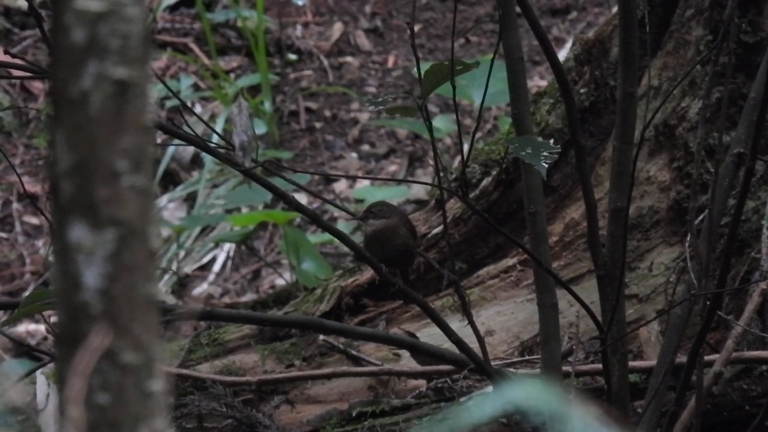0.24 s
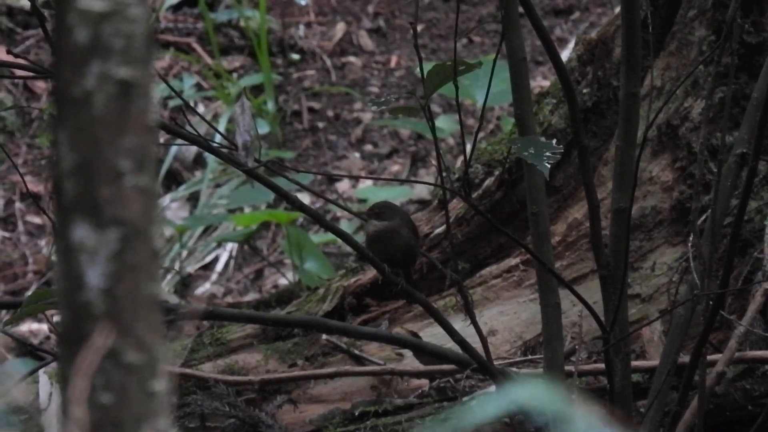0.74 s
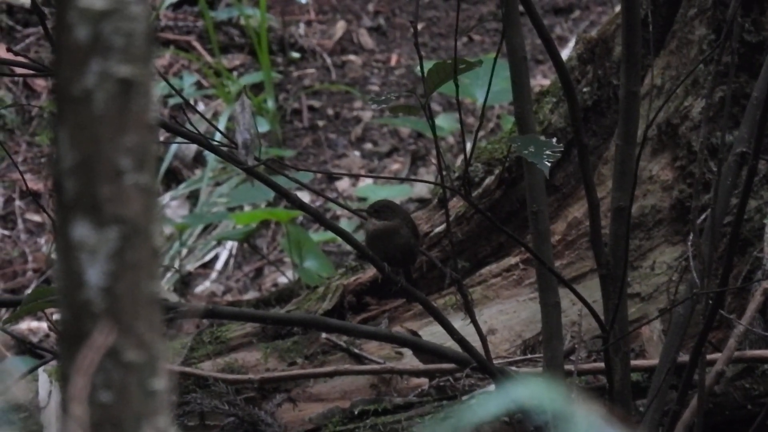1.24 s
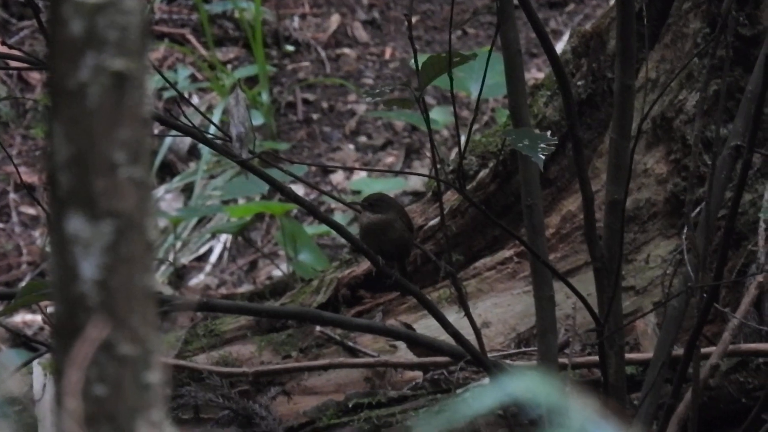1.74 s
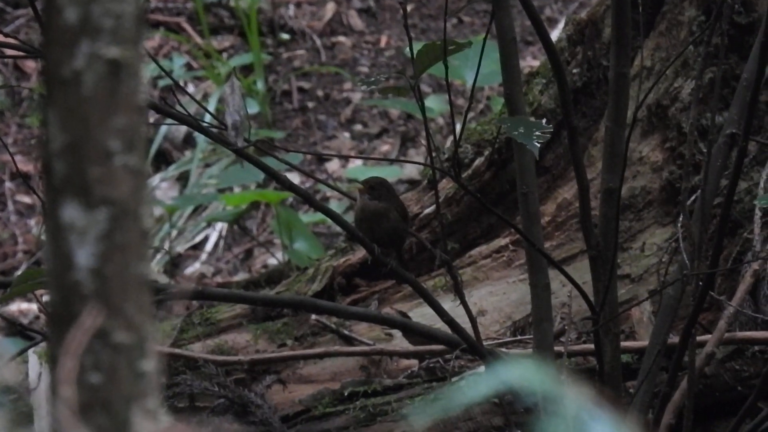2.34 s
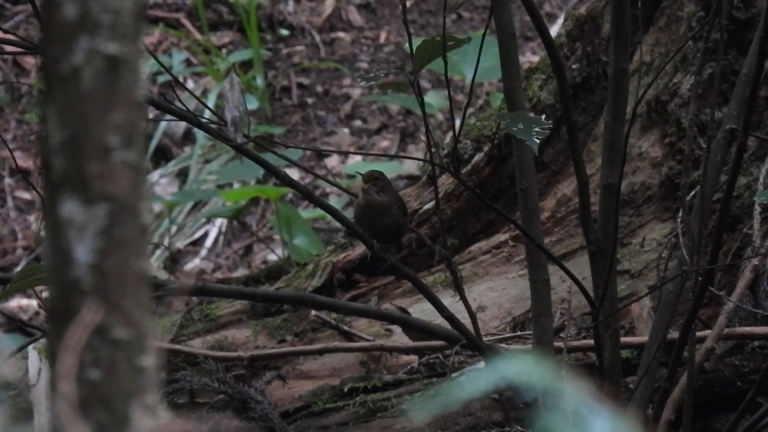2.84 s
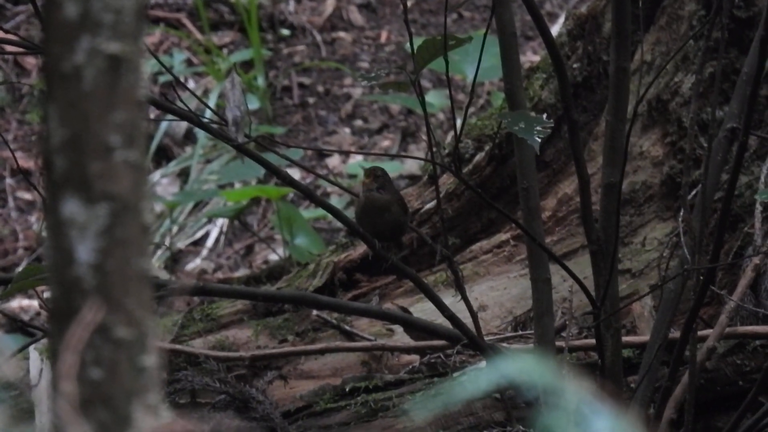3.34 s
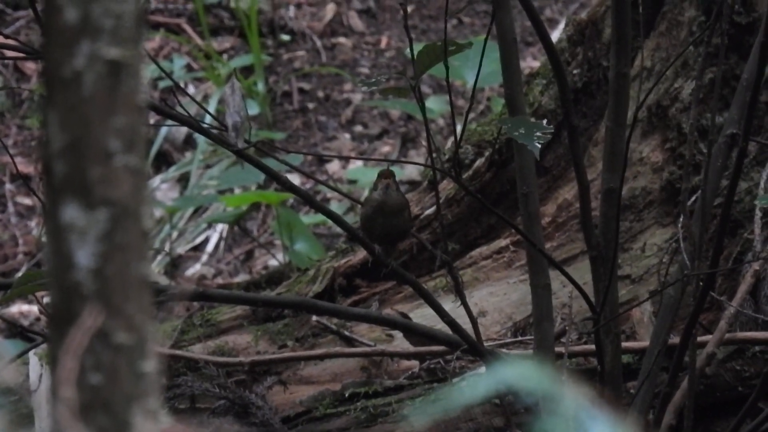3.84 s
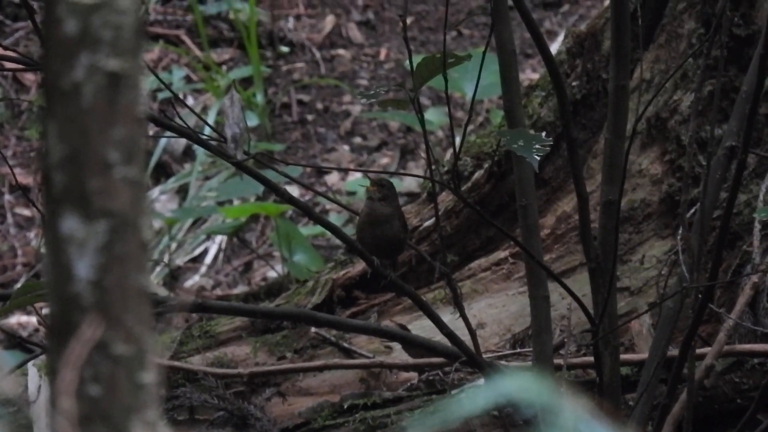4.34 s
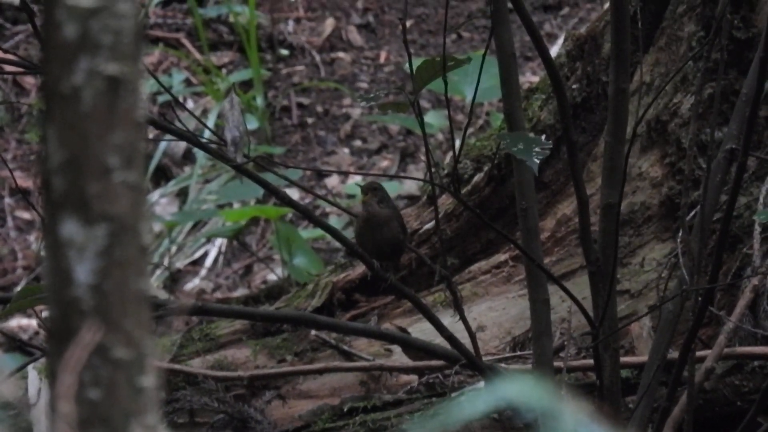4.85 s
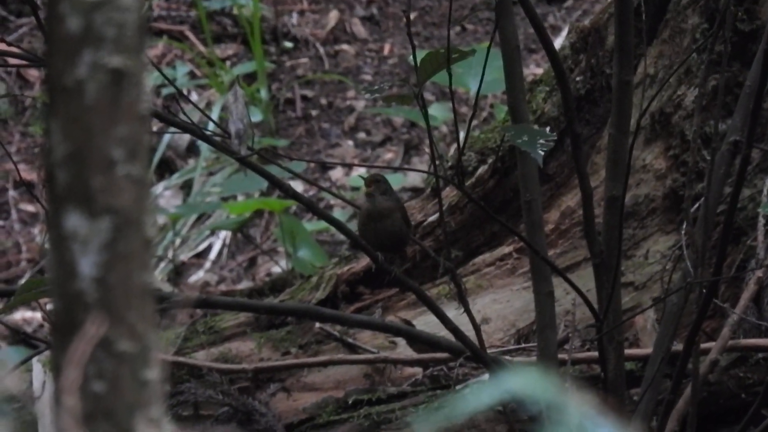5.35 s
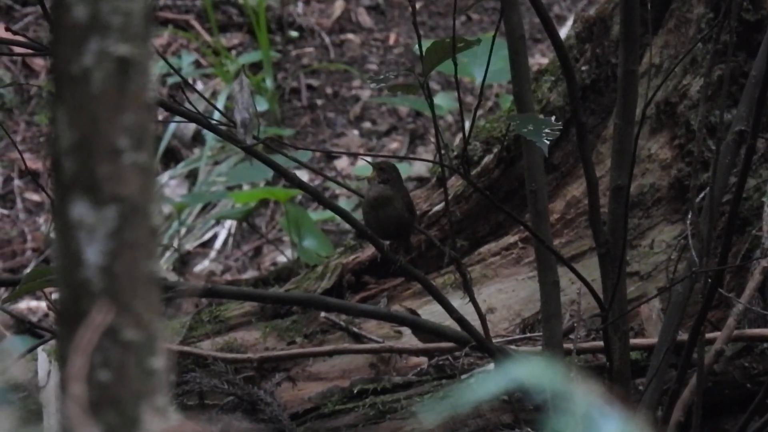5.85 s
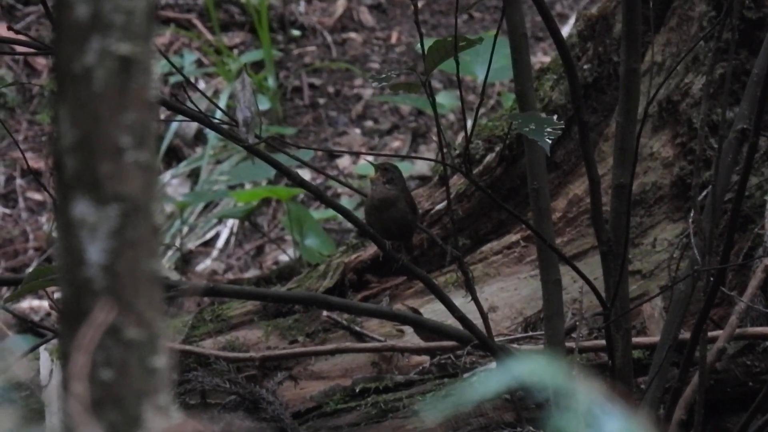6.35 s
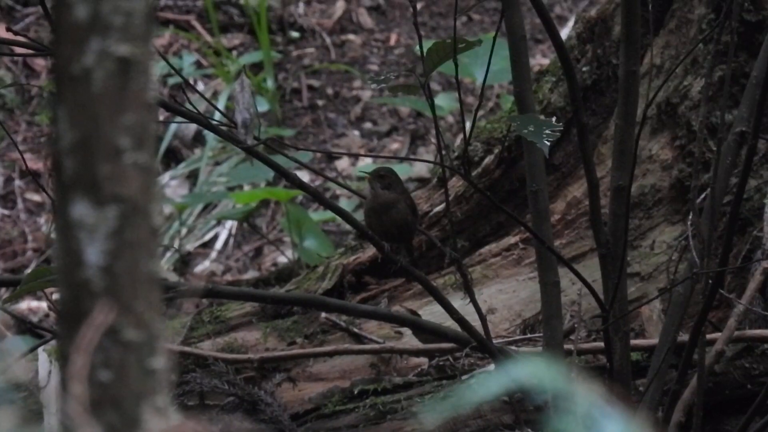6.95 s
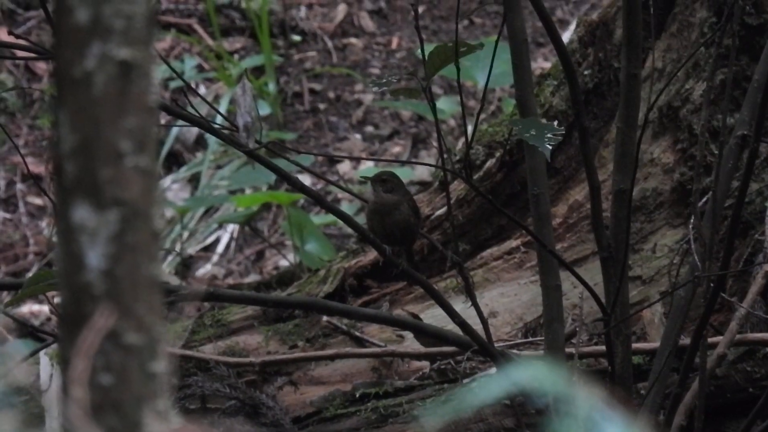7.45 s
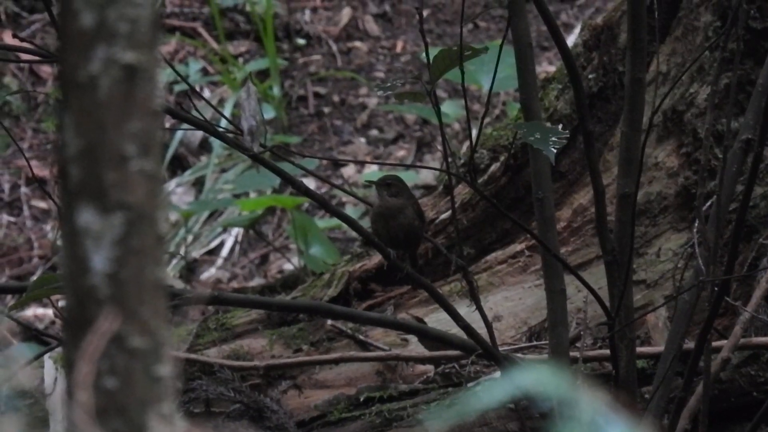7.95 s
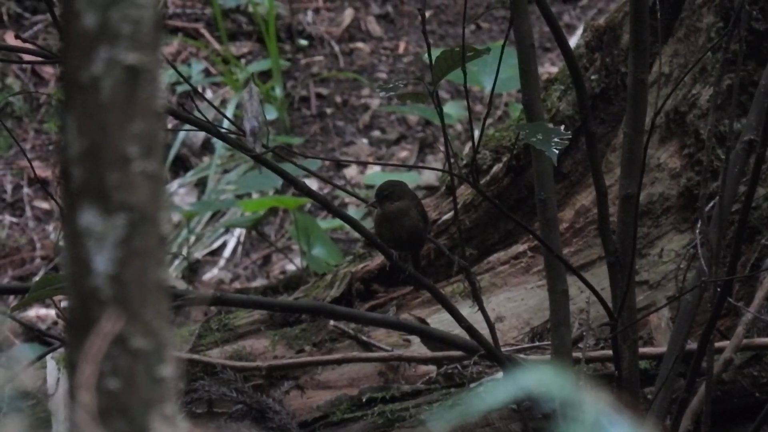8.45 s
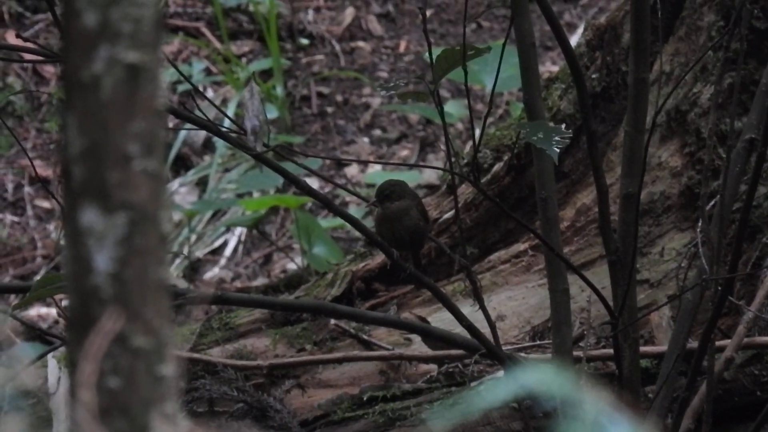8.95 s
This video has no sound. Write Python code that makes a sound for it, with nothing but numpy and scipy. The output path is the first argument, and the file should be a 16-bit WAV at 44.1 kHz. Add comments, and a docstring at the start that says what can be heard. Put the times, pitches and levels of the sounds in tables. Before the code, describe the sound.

A close wren pours out one long, fast, high song of whistles and trill over a steadily rushing, gurgling stream, answered by a farther bird.

```python
"""A stream rushes and gurgles throughout, with a few soft low knocks; a wren then sings one long song in a forest.
The water is shaped noise plus ringing bubbles, and each knock is a short sinking tone.
The wren's gliding whistles, soft rattle and closing trill are near-sines with a trace of their octave.
A more distant bird chips early and follows the wren with a repeated phrase made in the same way.
Trunks and leaves scatter every note of both birds into a tail."""
import sys
import numpy as np
from scipy import signal
from scipy.fft import rfft
from scipy.io import wavfile
from scipy.ndimage import uniform_filter1d

SR = 44100
rng = np.random.default_rng(int(sys.argv[2]) if len(sys.argv) > 2 else 0)


def unload_audio(sound):
    """Save the sound as a 16-bit wav file, at the path given as the first command line argument."""
    columns = np.transpose(np.atleast_2d(sound))
    # keep every value between -1 and 1, then stretch to whole-number steps
    steps = np.round(np.clip(columns, -1, 1) * 32767)
    wavfile.write(sys.argv[1], SR, steps.astype(np.int16))


N = 405719

# The wren's four repeated syllables, named for their pitch courses.
# Each row: seconds from the syllable's start, pitch in Hz, level in dB ahead of the gain of each repeat.
SCOOP = [(0, 5590, -30.5), (.021, 5310, -23.5), (.037, 4710, -20.5), (.053, 4172, -27), (.066, 4760, -23),
         (.077, 5730, -25)]
HOOK = [(0, 6385, -38), (.02, 6010, -32), (.027, 5783, -22.5), (.038, 5710, -21.5), (.056, 6110, -31),
        (.073, 6600, -28), (.083, 7950, -35)]
SLIDE = [(0, 5457, -30), (.017, 5295, -23), (.038, 4613, -19), (.059, 4230, -27), (.076, 3983, -23)]
ARCH = [(0, 4850, -39), (.012, 5680, -21.5), (.022, 6080, -31.5), (.036, 6330, -31), (.052, 6400, -32),
        (.064, 6130, -35), (.073, 5700, -22), (.088, 5180, -24.5), (.095, 5220, -33)]


def gain_of(db):
    """A level in decibels is twenty times the logarithm of its amplitude ratio."""
    return 10 ** (np.asarray(db) / 20)


def evened(x):
    """Division by the root mean square gives a signal unit rms."""
    return x / np.sqrt(np.mean(x ** 2) + 1e-20)


def read(points, hz):
    """Interpolation on a log-frequency axis gives equal musical intervals equal weight."""
    f, value = np.transpose(points)
    return np.interp(np.log(hz + 1), np.log(f + 1), value)


def add(mix, s, sound):
    """Superposition: a sound is summed into the mix from time s in seconds."""
    part = mix[..., max(round(s * SR), 0):][..., :sound.shape[-1]]
    part += sound[..., :part.shape[-1]]


def drift(count, size):
    """Low-pass noise: white noise under a Hann kernel of size samples varies smoothly at about unit rms."""
    kernel = np.hanning(size)
    noise = rng.standard_normal(count + size - 1)
    return signal.fftconvolve(noise, kernel / np.linalg.norm(kernel), "valid")


def beats(first_s, last_s, count):
    """A periodic rhythm: evenly spaced moments, both ends included."""
    return np.linspace(first_s, last_s, count)


def stream(level_db=-46.5, patchy_db=2.5, swell_db=0.2, lumpy_below_hz=2800):
    """Turbulent water radiates broadband noise: lumpy where the bubbles ring, a smooth hiss above."""
    # Spectrum of the rush. Each row: frequency in Hz, relative level per Hz in dB.
    rush_spectrum = [(50, -50.5), (140, -39.5), (200, -28), (260, -8.5), (390, -4.5), (510, -6), (690, -2),
                     (750, -3), (880, -1), (1100, -3.5), (1400, -4.5), (1650, -3.5), (2050, -5.5),
                     (2350, -4.5), (2800, -8), (4000, -7.5), (4600, -6.5), (6600, -14), (8300, -16),
                     (10000, -24), (12500, -38), (14500, -44)]
    # Coherence of the two channels. Each row: frequency in Hz, left-right correlation (no unit).
    rush_likeness = [(60, 0.68), (140, 0.85), (310, 0.92), (700, 0.93), (1590, 0.78), (3610, 0.41),
                     (8200, -0.098)]
    # Balance of the channels. Each row: frequency in Hz, left minus right in dB.
    rush_balance = [(60, -7), (210, 1), (700, 0.5), (2400, -0.5), (8200, 0.5)]
    frames, hz = N // 256 + 5, np.fft.rfftfreq(1024, 1 / SR)
    a, b, c, d, patches = rng.standard_normal((frames, len(hz), 5)).T
    patches = uniform_filter1d(patches, size=5, axis=0)
    patches = evened(uniform_filter1d(patches, size=6, axis=1))
    same = np.clip(read(rush_likeness, hz), -1, 1)[:, None]
    left, independent = a + 1j * b, c + 1j * d
    right = same * left + np.sqrt(1 - same ** 2) * independent
    z = np.array([left, right])
    lumps_db = patchy_db * patches / (1 + (hz[:, None] / lumpy_below_hz) ** 2)
    z *= gain_of(read(rush_spectrum, hz)[:, None] + lumps_db + swell_db * drift(frames, size=120))
    lean_db = read(rush_balance, hz)[:, None]
    z *= gain_of(np.array([lean_db, -lean_db]) / 2)
    rush = signal.istft(z, nperseg=1024, noverlap=768)[1][:, :N]
    return gain_of(level_db) * evened(rush)


def bubbles(per_s=100, level_db=-58, low_hz=640, high_hz=2500, cycles=11, spread_db=4.0, count=36):
    """Bubble resonance: many small bubbles ring in the riffles, each for a few cycles and rising slightly."""
    water, t = np.zeros((2, N)), np.arange(SR // 8) / SR
    for hz in np.geomspace(low_hz, high_hz, count):
        age = t * hz / cycles
        ring = age * np.exp(-age) * np.sin(2 * np.pi * hz * t * (1 + 0.17 * t))
        struck = rng.random(N) < per_s / count / SR  # the pitches share the rate equally
        sizes = struck * gain_of(spread_db * np.minimum(rng.exponential(1, N), 3))
        lean_db = rng.normal(0, 2)
        water += signal.oaconvolve(sizes, ring)[:N] * gain_of([[lean_db / 2], [-lean_db / 2]])
    return gain_of(level_db) * evened(water)


def gurgles(swell_s=0.015, rise_per_s=0.23, waver=0.052):
    """Air-cavity resonance: large pockets of air ring under the water, their pitch unsteady and rising a little."""
    # The louder gurgles. Each row: start in seconds, initial central pitch in Hz, peak level in dB.
    air_pockets = [(.06, 647, -51), (.29, 628, -47), (.325, 380, -47.5), (.41, 728, -45), (.69, 420, -48.5),
                   (1.03, 520, -51.5), (2.06, 290, -50), (2.345, 697, -49.5), (2.875, 604, -49),
                   (3.915, 406, -45.5), (4.01, 403, -47.5), (4.415, 393, -45), (5.425, 394, -45),
                   (5.53, 393, -51), (6.0, 695, -47), (6.985, 390, -44.5), (7.39, 396, -45.5),
                   (8.045, 375, -49.5), (8.34, 428, -47), (9.11, 864, -46), (9.135, 338, -44)]
    water, t = np.zeros(N), np.arange(SR // 6) / SR
    ring = (t / swell_s * np.exp(1 - t / swell_s)) ** 2
    for s, hz, db in air_pockets:
        pitch = hz * (1 + rise_per_s * t + waver * drift(len(t), size=600))
        tone = np.sin(2 * np.pi * np.cumsum(pitch) / SR)
        add(water, s, np.sqrt(2) * gain_of(db) * ring * tone)
    return water


def knocks(swell_s=0.0042, fall_per_s=4, lowest_hz=170):
    """Damped oscillation: a few soft, dull low knocks, each only some cycles long and sinking in pitch."""
    # The dull knocks. Each row: start in seconds, initial pitch in Hz, peak level in dB ahead of the high-pass.
    dull_knocks = [(1.345, 248, -55.5), (1.647, 260, -52), (2.592, 285, -56), (8.304, 275, -56)]
    sound, t = np.zeros(N), np.arange(SR // 12) / SR
    ring = (t / (2 * swell_s)) ** 2 * np.exp(2 - t / swell_s)
    for s, hz, db in dull_knocks:
        pitch = hz * np.exp(-fall_per_s * t)
        tone = np.sin(2 * np.pi * np.cumsum(pitch) / SR)
        add(sound, s, np.sqrt(2) * gain_of(db) * ring * tone)
    return signal.sosfilt(signal.butter(4, lowest_hz, "highpass", fs=SR, output="sos"), sound)


def forest(x, near_db, tail_db, trunk_db, near_s=0.017, build_s=0.011, patchy_db=2, trunk_lag_s=.011):
    """Multiple scattering: a close trunk echoes clearly, nearby wood in a cluster, farther wood in an uneven tail."""
    # Reverberation time. Each row: frequency in Hz, time to fall by 60 dB in seconds.
    decay_times = [(400, .6), (3300, 1), (4500, 0.92), (6000, 0.9), (8000, 0.51), (13000, .3)]
    t = np.arange(SR) / SR
    taps = rng.standard_normal((2, SR)) * (rng.random((2, SR)) < 4000 / SR)  # sparse random reflections
    hz, age, z = signal.stft(taps, SR, nperseg=256)
    patches = evened(uniform_filter1d(rng.standard_normal(z.shape[1:]), size=18, axis=1))
    fade_db = patchy_db * patches - 60 * age / read(decay_times, hz)[:, None]
    tail = signal.istft(z * gain_of(fade_db), SR, nperseg=256)[1][:, :SR]
    tail = tail * (1 - np.exp(-t / build_s))
    near = rng.standard_normal((2, SR)) * (rng.random((2, SR)) < 1500 / SR)
    near = near * np.exp(-t / near_s) * (t > .002)
    echoes = np.zeros((2, SR))
    for db, part in [(near_db, near), (tail_db, tail)]:
        # levels hold in the song band; one second of taps makes each bin 1 Hz wide
        power = np.mean(abs(rfft(part)[:, 4000:8000]) ** 2, 1, keepdims=True)
        echoes += gain_of(db) * part / np.sqrt(power)
    echoes[:, round(trunk_lag_s * SR)] += gain_of(trunk_db)
    return x + signal.fftconvolve(x, echoes, axes=1)[:, :N]


def slur(start, length, start_hz, turn_hz, end_hz, turn, db, swell_db, lean_db=0):
    """Frequency modulation: pitch glides to a turn and on to its end, while the level arches and swells."""
    arch_db = 7  # the ends fall this far below the middle, apart from the swell
    u = np.linspace(0, 1, num=21)
    pitch = np.interp(u, [0, np.clip(turn, .05, .95), 1], [start_hz, turn_hz, end_hz])
    level = db + swell_db * (u - .5) - arch_db * (2 * u - 1) ** 2
    return np.column_stack([start + length * u, pitch, level, np.full(len(u), lean_db)])


def placed(shape, s, db, lean_db=0):
    """Time translation and gain: a practised syllable's course is moved to time s and raised by db."""
    return np.column_stack([np.array(shape) + [s, 0, db], np.full(len(shape), lean_db)])


def whistle(rows, waver=0.0013, flutter_db=1.2, octave_db=0, attack_share=.13, release_s=0.0045):
    """Syrinx oscillation: one gliding near-sine with a slight tremble and a trace of its second harmonic."""
    # The second harmonic. Each row: pitch in Hz, level of its octave against it in dB ahead of octave_db.
    overtone = [(3800, -31.5), (5000, -47), (5800, -47), (7000, -60.5), (8000, -76)]
    s, hz, db, *side = np.transpose(rows)
    s = np.sort(s)
    attack_s = attack_share * (s[-1] - s[0]) + .001  # longer notes swell in more slowly
    t = np.arange(s[0] - attack_s / 2, s[-1] + release_s / 2, 1 / SR)
    pitch = uniform_filter1d(np.interp(t, s, hz), size=160, mode="nearest")  # muscles round the corners
    phase = 2 * np.pi * np.cumsum(pitch * (1 + waver * drift(len(t), size=110))) / SR
    ramp = np.minimum((t - t[0]) / attack_s, (t[-1] - t) / release_s)
    edges = np.sin(np.pi / 2 * np.clip(ramp, 0, 1)) ** 2
    level = edges * gain_of(np.interp(t, s, db) + flutter_db * drift(len(t), size=600))
    octave = gain_of(read(overtone, pitch) + octave_db) * np.sin(2 * phase)
    tone = np.sqrt(2) * level * (np.sin(phase) + octave)
    lean_db = np.interp(t, s, side[0]) if side else np.zeros(len(t))
    return t[0], tone * gain_of(np.array([lean_db, -lean_db]) / 2)


def far_bird(level_db=-1, burr_pulse_s=.004, burr_fall_hz=200, burr_scatter_hz=95, burr_jitter_s=0.0006,
             burr_uneven_db=2):
    """Pulsed phonation: after a chip and slurs, a phrase twice a second of upsweep, ticks and a burr of pulses."""
    # All levels in these tables stand ahead of level_db.
    # Early chip and opening slurs. Each row: start in seconds, length in seconds, start pitch in Hz, turn pitch
    # in Hz, end pitch in Hz, place of the turn from 0 to 1, level in dB, swell from start to end in dB.
    opening_slurs = [(.381, 0.0079, 5010, 4500, 4050, 0.46, -46.5, -2),
                     (6.86, .045, 4030, 3850, 3700, 0.36, -54.5, -3),
                     (6.925, .06, 3630, 3430, 3250, 0.54, -57, 0),
                     (7.316, 0.073, 4350, 4350, 4100, 0.64, -43, 0),
                     (7.388, 0.088, 3800, 3300, 2680, 0.45, -52, -2),
                     (7.389, .072, 5960, 5220, 4580, .42, -53, 4),
                     (7.46, 0.027, 6200, 5450, 4800, .5, -50, 0),
                     (7.49, 0.0236, 4330, 4350, 4280, .5, -46, -3)]
    # Second voice under the upsweep, then quick ticks and soft slurs. Each row: start in seconds from the
    # phrase's start, then the other columns of the opening slurs, the level ahead of the phrase's gain.
    phrase_slurs = [(.026, 0.0178, 5040, 5420, 5750, .5, -51, -1),
                    (.076, 0.0055, 3650, 3300, 2940, 0.56, -47, 2),
                    (.084, .004, 5300, 4700, 4060, 0.46, -50, 2),
                    (.095, .011, 5350, 4790, 4150, .5, -48.5, 3),
                    (.105, .065, 2600, 2786, 3080, 0.49, -58, 0),
                    (0.1447, .0095, 4220, 4950, 5800, 0.49, -44.5, -2),
                    (.1655, 0.0045, 3850, 4600, 5750, 0.5, -41.5, -9),
                    (.275, .024, 4430, 5300, 5800, 0.44, -54, -2),
                    (.302, .004, 4200, 4900, 5600, .5, -53, 0)]
    # The phrase's repeats. Each row: start in seconds, gain in dB, gain of its burr in dB.
    phrase_times = [(7.696, 2.5, 2.5), (8.184, 3.5, 4), (8.656, 3.5, 2.5), (9.128, 2, 2)]
    # Opening upsweep. Each row: seconds from the phrase's start, pitch in Hz, level in dB ahead of its gain.
    upsweep = [(0, 4347, -47), (.008, 4060, -51), (.016, 4400, -48), (.022, 5080, -41), (.033, 5900, -52),
               (.05, 6300, -52), (.07, 6750, -56)]
    # Low burr. Each row: seconds from the phrase's start, central pitch in Hz, level in dB ahead of its gain.
    burr = [(.173, 3490, -45.5), (.208, 3390, -46), (.24, 3250, -49), (.256, 3200, -52), (.29, 3150, -59)]
    song = np.zeros((2, N))
    for row in opening_slurs:
        add(song, *whistle(slur(*row), waver=0.0063, flutter_db=2.0))
    burr_s, burr_hz, burr_db = np.transpose(burr)
    for s, db, burr_lift_db in phrase_times:
        add(song, *whistle(placed(upsweep, s, db), waver=0.013, flutter_db=2.5))
        for row in phrase_slurs:
            add(song, *whistle(slur(*row) + [s, 0, db, 0], waver=0.0045, flutter_db=0.5))
        for at in beats(burr_s[0], burr_s[-1], count=21):
            late, sharp, loud = rng.standard_normal(3)
            hz = np.interp(at, burr_s, burr_hz) + burr_scatter_hz * sharp
            pulse_db = np.interp(at, burr_s, burr_db) + burr_lift_db + burr_uneven_db * loud
            pulse_start = s + at + burr_jitter_s * late
            pulse = slur(pulse_start, burr_pulse_s, hz + burr_fall_hz, hz, hz - burr_fall_hz, 0.45, pulse_db, 0)
            add(song, *whistle(pulse, octave_db=14))
    return gain_of(level_db) * song


def wren(trill_lean_db=1, uneven_db=1.2):
    """Rapid frequency modulation: slurs, whistles, syllables, a rattle and a trill of alternating upsweeps."""
    # Single slurs. Each row: start in seconds, length in seconds, start pitch in Hz, turn pitch in Hz, end pitch
    # in Hz, place of the turn from 0 to 1, level in dB, swell from start to end in dB, left minus right in dB.
    single_slurs = [(2.25, 0.062, 6350, 6150, 6100, 0.25, -41, 5, -3),
                    (2.369, 0.056, 6600, 6210, 6170, 0.57, -40, 9, 4.5),
                    (2.452, 0.022, 4970, 4530, 4160, 0.5, -43, -2, 3),
                    (2.5, 0.02, 5170, 5160, 5440, 0.67, -36, 6, 8),
                    (2.664, .048, 7330, 7920, 8440, 0.44, -34, 3.5, 0),
                    (2.762, 0.047, 7460, 8000, 8690, 0.44, -32, -1, 0),
                    (2.857, 0.061, 5774, 5636, 5790, 0.38, -22, 1, 3),
                    (3.222, 0.11, 6560, 6873, 6975, 0.43, -24, 3.5, -3.5),
                    (3.32, 0.011, 6920, 7100, 7330, 0.4, -39, -4, -2),
                    (3.391, 0.024, 7740, 7920, 8150, 0.4, -32, 4, 0),
                    (3.411, 0.044, 8010, 7770, 7700, 0.44, -25, -5, -1.5),
                    (3.788, .013, 5480, 5440, 5380, .5, -32, 6, 2.7),
                    (4.191, 0.021, 4050, 4010, 3710, 0.55, -32.5, 12.5, -2),
                    (4.246, .016, 4380, 4410, 4430, 0.4, -27, -2, 3),
                    (4.303, 0.03, 7950, 7310, 7230, 0.38, -24, 6, -2),
                    (4.534, 0.049, 4420, 4300, 4066, 0.5, -25.5, 12.5, 0),
                    (4.617, 0.065, 4400, 4440, 4366, 0.26, -27.5, 4, 4.5),
                    (4.83, 0.017, 5900, 5700, 5530, 0.52, -21, 4, 3),
                    (5.017, .013, 5970, 5970, 5700, 0.7, -27.5, 0, 5),
                    (5.292, 0.054, 4290, 4332, 4600, 0.5, -25, -5, 3),
                    (5.865, 0.014, 4650, 4705, 4800, 0.57, -21, -1, 1.5),
                    (5.902, 0.022, 4340, 4200, 4050, 0.52, -27, 4, -0.5),
                    (5.981, 0.057, 8650, 7800, 7430, 0.44, -30, 21, -0.5),
                    (6.057, 0.061, 7380, 7275, 7185, 0.53, -23, 2, -4)]
    # Long whistles, one list each. Each row: time in seconds, pitch in Hz, level in dB, left minus right in dB.
    long_whistles = [
        [(2.553, 5290, -39, 3), (2.566, 5200, -31.5, 4), (2.58, 4980, -31.5, 3), (2.594, 4860, -32, 3.5),
         (2.609, 4835, -34.5, 4)],
        [(4.38, 6250, -47, -4), (4.403, 6310, -29.5, -4), (4.45, 6320, -28, 5), (4.465, 6020, -27, 2),
         (4.476, 5560, -22, 6), (4.483, 5370, -34, 2)],
        [(5.108, 4610, -29.5, -1), (5.12, 4550, -24, 4.5), (5.135, 4490, -24, 5), (5.16, 4410, -28, 5),
         (5.2, 4165, -24, -2.5), (5.212, 3990, -28, -2)],
        [(5.565, 6950, -49, -1), (5.578, 7300, -45, -1), (5.592, 7750, -28, -1), (5.63, 7910, -28, 1),
         (5.66, 8280, -29.5, 1), (5.698, 8400, -34.5, -1), (5.711, 8740, -32, 0)],
        [(5.783, 5060, -30.5, 1), (5.8, 4900, -31, 1), (5.809, 4750, -17, 6), (5.82, 4550, -22.5, 1),
         (5.838, 4190, -26, 1)],
        [(6.181, 5350, -40, 3.5), (6.191, 5200, -24, 5), (6.201, 5030, -22, 5), (6.213, 4874, -24.5, 3.5),
         (6.228, 4787, -20.5, 3.5)],
    ]
    # Repeated syllables. Each row: syllable, start in seconds, gain in dB, left minus right in dB.
    syllables = [(SCOOP, 3.523, 0, 3), (HOOK, 3.644, 0, 5.1), (SCOOP, 3.798, 0.68, 2.7),
                 (HOOK, 3.924, 0.4, 2.5), (SLIDE, 4.08, .5, 2), (ARCH, 4.72, 0, 4.4), (ARCH, 4.898, 0, 3),
                 (SLIDE, 5.395, .5, 0.95)]
    # One flick of the rattle. Each row: seconds from its start, pitch in Hz, level against the flick's in dB.
    flick = [(0, 4400, -5), (.0035, 4880, 2.5), (.0065, 6100, 3)]
    # Low and high strokes of the trill. Each row: seconds from the stroke's start, pitch in Hz, level against the
    # stroke's in dB; the high stroke's last pitch gives way to the top pitch of its pair.
    low_stroke = [(0, 5150, -17), (.003, 5570, -8.5), (.007, 5783, 0), (.012, 6000, -9)]
    high_stroke = [(.006, 6370, -15), (.013, 6500, -9.5), (0.019, 6730, -2.5), (.023, 7150, -5),
                   (0.026, 7900, -8.5)]
    # Pairs of strokes. Each row: start in seconds, low level in dB, high level in dB, top pitch in Hz.
    trill = [(6.264, -21.5, -20.5, 7880), (6.349, -24.5, -21.5, 7850), (6.434, -23, -20.5, 7870),
             (6.514, -25.5, -22, 7900), (6.594, -23.5, -23.5, 7980), (6.675, -23.3, -23, 7520),
             (6.757, -22, -23.5, 7650), (6.84, -23, -24, 7500), (6.922, -23, -24.5, 7400),
             (7.006, -25, -23, 7400)]
    rattle_start_s, rattle_end_s, rattle_db = 2.955, 3.154, -44
    high_lag_s = .026  # each high stroke follows its low one by this much
    ground_lag_s, ground_db = .0032, -10  # the ground returns each high stroke and thickens it
    song = np.zeros((2, N))
    for row in single_slurs:
        add(song, *whistle(slur(*row)))
    for course in long_whistles:
        add(song, *whistle(course))
    for row in syllables:
        add(song, *whistle(placed(*row)))
    for s in beats(rattle_start_s, rattle_end_s, count=7):
        add(song, *whistle(placed(flick, s, rattle_db + uneven_db * rng.normal())))
    for s, low_db, high_db, top_hz in trill:
        add(song, *whistle(placed(low_stroke, s, low_db, trill_lean_db)))
        high = placed(high_stroke, s + high_lag_s, high_db, trill_lean_db)
        high[-1, 1] = top_hz
        start, stroke = whistle(high)
        add(song, start, stroke)
        add(song, start + ground_lag_s, gain_of(ground_db) * stroke)
    return song


def scene():
    """Superposition of the stream's sounds, the knocks and the two birds, each bird with its own scattering."""
    deep_bubbles = bubbles(per_s=24, level_db=-62.0, low_hz=299.7, high_hz=617, cycles=3.3, spread_db=2.5, count=12)
    water = stream() + bubbles() + deep_bubbles + gurgles()
    distant = forest(far_bird(), near_db=-2.5, tail_db=2.0, trunk_db=-13)
    close = forest(wren(), near_db=-5.5, tail_db=-4.9, trunk_db=-15.5)
    return water + knocks() + distant + close


def record(dry, edge_hz=14500):
    """Band limitation: the recorder's linear-phase low-pass removes what lies above edge_hz."""
    lowpass = signal.firwin(511, edge_hz, window=("kaiser", 9), fs=SR)
    return signal.oaconvolve(dry, lowpass[None], "same")


dry = scene()
out = record(dry)
unload_audio(out)
```